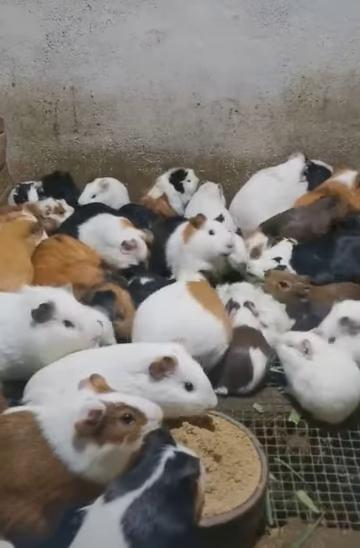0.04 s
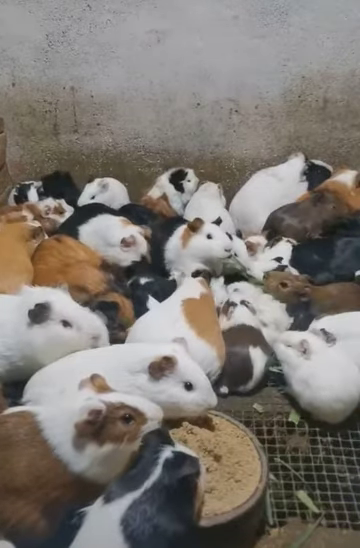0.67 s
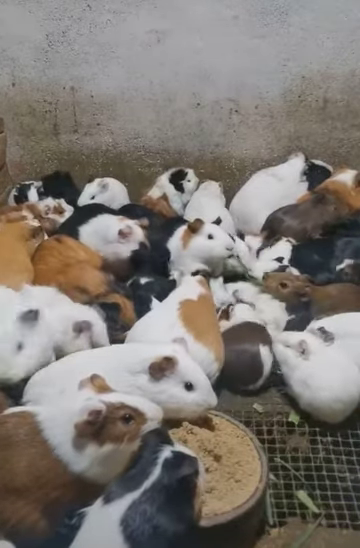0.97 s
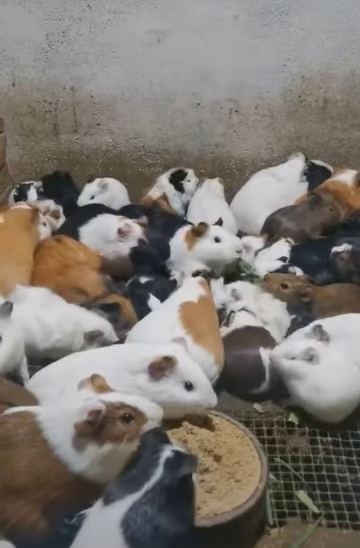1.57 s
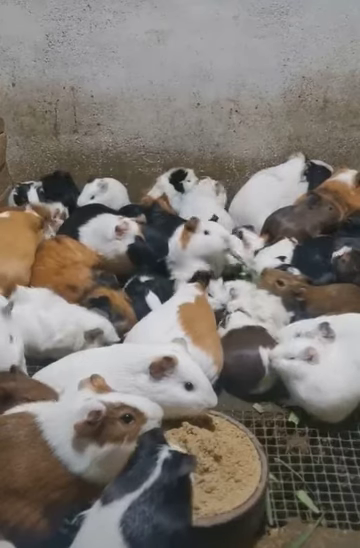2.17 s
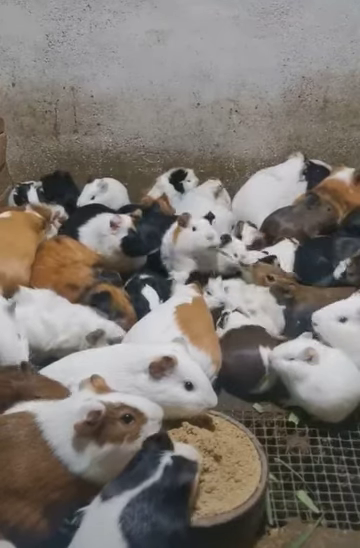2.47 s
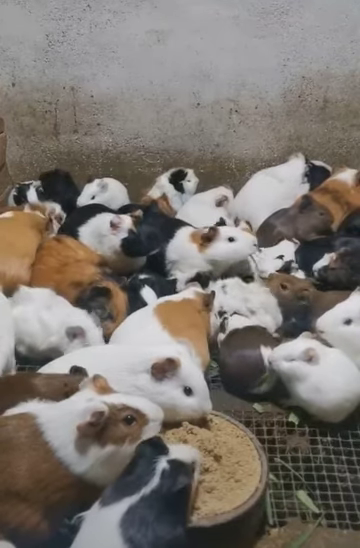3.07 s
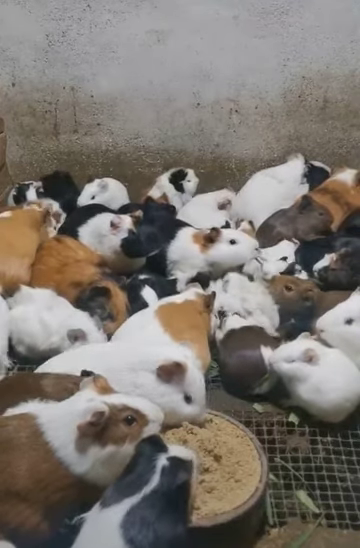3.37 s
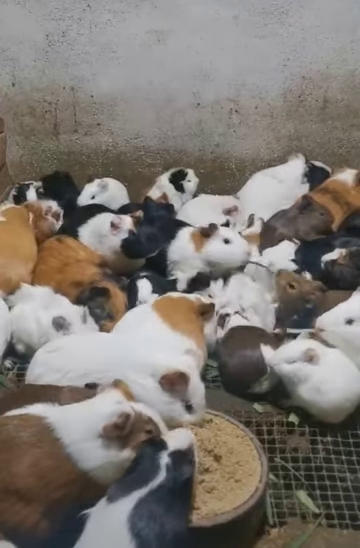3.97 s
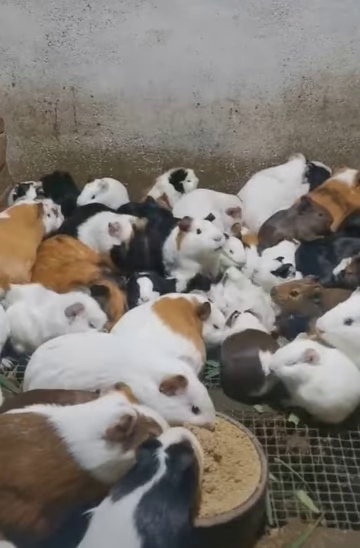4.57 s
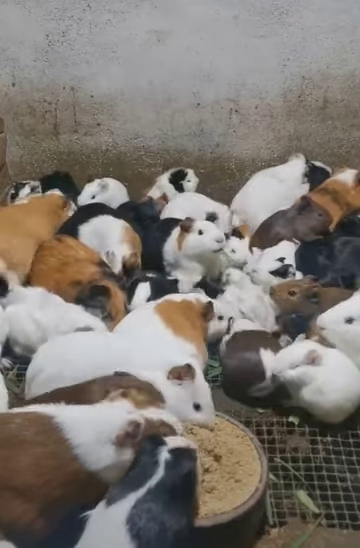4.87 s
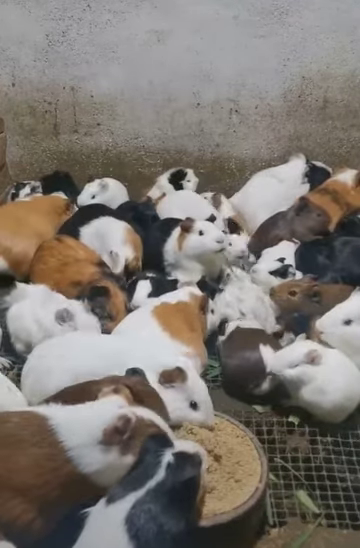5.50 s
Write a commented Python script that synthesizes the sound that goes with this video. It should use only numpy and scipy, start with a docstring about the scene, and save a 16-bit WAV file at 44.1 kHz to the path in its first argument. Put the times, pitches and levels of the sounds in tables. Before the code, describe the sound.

A herd of guinea pigs calls nearby throughout, in short notes that dip and flick upward, several a second, with a brief echo from concrete walls. Underneath are a steady fine crackle of nibbling, a soft air rumble and a faint electric hum. Feet scrape brightly over wire mesh, mostly in the first 1.4 seconds. Rough squeals and hoarse, more distant squabbling come from 0.6 to 1.5 seconds. Grass stalks crackle around 1.3 seconds, and a claw plucks the wire with a sharp click at 1.85; smaller ringing clicks are scattered elsewhere. Between 2.5 and 3.1 seconds come yips, louder bending squeals and two very faint, thin, high whistles. Near 4 seconds a wire rattle and a grass crackle lead into three quick yips. From 4.6 to 5.4 seconds a dense run of squeals overlaps more squabbling, and a few last calls follow at about 5.7.

```python
"""A crowd of guinea pigs calls and feeds on a wire mesh floor in a concrete pen.
They chut (short notes that dip, then flick upward), and squeal, yip and squabble as they jostle;
strain makes their voices rough. Feet scrape and claws pluck the wire, so it rings, and grass
stalks crackle as they tear. Under it the herd nibbles steadily, the air rumbles and the mains
hum faintly. Two thin, very high whistles pass midway, and the walls add a short echo."""
import sys
import numpy as np
from scipy import signal
from scipy.fft import rfft, irfft
from scipy.io import wavfile
from scipy.ndimage import uniform_filter1d, minimum_filter1d

SR = 44100
rng = np.random.default_rng(int(sys.argv[2]) if len(sys.argv) > 2 else 0)


def dump_mix(stems):
    """Bounce the given channels to the path in sys.argv[1] as a 16-bit WAV at rate SR."""
    frames = np.atleast_2d(stems).T  # one column per channel
    limited = np.clip(frames, -1, 1)  # hard clip at full scale
    pcm = np.round(limited * 32767).astype(np.int16)
    wavfile.write(sys.argv[1], SR, pcm)


N = 253134
TIME = np.arange(N) / SR


def from_db(db):
    """Turn decibels into a number to multiply by."""
    return 10 ** (np.asarray(db) / 20)


def rms_one(x):
    """Scale a signal so that its average power is 1."""
    return x / np.sqrt(np.mean(x ** 2) + 1e-20)


def at_hz(points, hz):
    """Read the level at a frequency from a curve of (frequency_hz, level_db) points."""
    point_hz, point_db = np.transpose(points)
    return np.interp(np.log(np.maximum(hz, 1)), np.log(point_hz), point_db)


def colour(x, spectrum):
    """Shape the tone of a signal with a curve of levels; the result has power 1."""
    hz = np.arange(N // 2 + 1) * SR / N
    return rms_one(irfft(rfft(x) * from_db(at_hz(spectrum, hz)), N))


def band(x, low_hz, high_hz):
    """Gently turn down everything outside two frequencies."""
    sos = signal.butter(2, [low_hz, min(high_hz, .45 * SR)], "band", fs=SR, output="sos")
    return signal.sosfilt(sos, x + 1e-18)


def above(x, edge_hz):
    """Steeply cut everything below a frequency."""
    return signal.sosfilt(signal.butter(4, edge_hz, "high", fs=SR, output="sos"), x + 1e-18)


def wobble(per_s, t):
    """A random wavering, about 1 in size, that takes a new turn per_s times a second."""
    knots = rng.standard_normal(int(len(t) * per_s / SR) + 2)
    return np.interp(np.arange(len(t)) * per_s / SR, np.arange(len(knots)), knots)


def span(start, end):
    """The time of each sample from start to end, in seconds."""
    return np.arange(round(start * SR), max(round(end * SR), round(start * SR) + 2)) / SR


def add(out, t, sound):
    """Mix a sound into out at the times t."""
    at = np.round(t * SR).astype(int)
    inside = (at >= 0) & (at < N)
    out[..., at[inside]] += sound[..., inside]


def phase_of(hz):
    """The growing angle of a wave that follows a changing pitch."""
    return 2 * np.pi * np.cumsum(hz) / SR


def cry(t, hz, rough, jitter=0.067, shimmer=0.95, overtone_db=-15, strain_db=11.5, rasp_db=-8):
    """A squealing voice: strain shakes its pitch and level, lifts the overtones and adds a rasp."""
    # how the throat boosts or weakens overtones: frequency_hz, level_db
    throat = [(200, -8), (900, 16), (1500, -0.5), (1750, 3), (1950, 0.5), (2150, -3.5), (2400, -15.5),
              (3000, -10), (5000, -16.5)]
    phase = phase_of(hz * (1 + jitter * rough * wobble(491, t)))
    tone = np.sin(phase)
    for k in (2, 3):
        level_db = (overtone_db + strain_db * rough) * np.log2(k) - 5.5 + at_hz(throat, k * hz)
        tone += from_db(level_db) * np.sin(k * phase)
    breath = rng.standard_normal(len(t)) * (1 + .5 * np.sin(phase))
    rasp = rms_one(signal.sosfilt(signal.butter(4, [750, 2050], "band", fs=SR, output="sos"), breath))
    shaky_tone = np.sqrt(2) * tone * (1 + shimmer * rough * wobble(329.7, t))
    return (shaky_tone + from_db(rasp_db) * rough * rasp) * from_db(1.5 * wobble(107.6, t))


def temper(flare_db=9, edge_s=.022, murmur_db=-65):
    """Loudness of the squabbling: each bout builds steadily, then breaks off to a faint murmur."""
    # bouts of squabbling: start_s, length_s, peak_db
    bouts = [(-.06, 0.082, -25), (0.584, .26, -22), (1.001, 0.14, -21.5), (1.809, .032, -18.5),
             (2.054, 0.27, -36.5), (2.8, 0.074, -25), (4.636, 0.155, -25), (5.017, 0.23, -24),
             (5.254, 0.16, -28), (5.417, 0.052, -33)]
    gain = np.full(N, from_db(murmur_db))
    for start, length, db in bouts:
        progress = np.clip((TIME - start) / length, 0, 1)
        edges = np.clip(np.minimum(TIME - start, start + length + edge_s - TIME) / edge_s, 0, 1)
        gain = np.maximum(gain, edges * from_db(db - flare_db * (1 - progress)))
    return gain


def squabble(count=170, gain_db=-2.5):
    """Many short hoarse cries overlap at the back of the pen, each sliding its own way."""
    # tone of the far-off voices: frequency_hz, level_db
    far_tone = [(350, -23), (650, -6), (1000, -8.5), (1450, 7.5), (1750, 4), (2100, 6),
                (2450, -7), (4000, -24)]
    out = np.zeros(N)
    for k, (late, length, pitch, slide) in enumerate(rng.random((count, 4))):
        start = (k + late) / count * N / SR
        t = span(start, start + 0.038 + 0.04 * length)
        hz = 560 * 2 ** (.9 * pitch + (slide - .4) * np.linspace(0, .4, len(t)))
        add(out, t, cry(t, hz, rough=0.52) * np.hanning(len(t)))
    return colour(out, far_tone) * temper() * from_db(gain_db)


def grains(per_s, spread_db):
    """Tiny taps at random moments, a few much harder than the rest."""
    sizes = from_db(spread_db * np.minimum(rng.exponential(1, N), 4)) * rng.choice([-1, 1], N)
    return rms_one(sizes * (rng.random(N) < per_s / SR))


def contact(age, attack_s, hold_s, fade_s):
    """Strength of a touch: it takes hold smoothly, lasts, then falls 60 dB in fade_s."""
    rise = np.sin(np.pi / 2 * np.clip(age / attack_s, 0, 1)) ** 2
    return rise * from_db(-60 * np.maximum(age - hold_s, 0) / fade_s)


def tread(force, tilt_db):
    """The spot trodden on splits a force between the wire's low and high ring; plus tilt favours high."""
    return force * from_db([[-tilt_db / 2], [tilt_db / 2]])


def mesh(taps, drive, split_hz=6900):
    """The wire floor rings under tiny taps; drive sets the strength of its low and its high ring."""
    # ring of the wire floor: frequency_hz, level_db
    wire_ring = [(1760, -30), (3000, -21.5), (3970, -28), (5250, -10.5), (7100, 3.5), (7460, 0), (7940, -9),
                 (8580, -11), (8820, -15), (9200, -21), (9870, -46), (10100, -85), (11200, -29),
                 (16000, -68)]
    ringing = colour(taps, wire_ring)
    lower = signal.sosfiltfilt(signal.butter(4, split_hz, fs=SR, output="sos"), ringing)
    return drive[0] * lower + drive[1] * (ringing - lower)


def scrapes(attack_s=0.027, fade_s=.28, fidget_db=-38.5, stutter_db=1.0):
    """Feet drag over the wire in runs of tiny slips: each scrape grips, stutters and rings out."""
    # foot drags: start_s, length_s, level_db, tilt_db
    drags = [(-.03, 0.033, -20.5, -6), (.06, 0.063, -22.5, -7), (0.103, 0.13, -12.5, -9.5),
             (0.246, 0.11, -13.5, -6.5), (0.691, 0.086, -20, -1), (.77, .11, -17.5, 2),
             (.89, 0.22, -20, -2), (1.012, 0.049, -16.5, -7), (1.105, 0.093, -27, 0),
             (1.244, 0.051, -13.5, 3), (1.32, 0.047, -21.5, 0), (1.59, .2, -28.5, 1),
             (1.785, 0.013, -16, -1), (2.34, 0.024, -17, 2), (2.65, 0.028, -24.5, 2),
             (2.806, 0.074, -27, 1), (2.963, .105, -20.5, -4), (3.102, .15, -30.5, -9),
             (3.352, 0.043, -25, 12), (4.668, 0.071, -30, -3), (5.347, .16, -27.5, -3)]
    power = np.full((2, N), from_db(fidget_db) ** 2)  # the herd never stands quite still
    for start, length, db, tilt_db in drags:
        t = span(start, start + length + fade_s)
        force = from_db(db) * contact(t - start, attack_s, length, fade_s)
        add(power, t, tread(force, tilt_db) ** 2)
    slips = grains(per_s=5000, spread_db=1.5)
    return mesh(slips, np.sqrt(power)) * from_db(stutter_db * wobble(70, TIME))


def chuts(jitter=0.044, dip=0.1415, third_db=-33, flutter_db=4, rasp_db=-17, throat_edge_hz=1270):
    """Each chut sags a little, then flicks up toward the pitch the throat rings at, which boosts it."""
    # chut notes (the octave is the overtone at twice the pitch):
    # start_s, length_s, low_pitch_hz, tone_db, octave_db
    notes = [(-.011, 0.04, 652, -16.5, -18), (.062, .067, 490, -21.5, -16), (0.337, 0.064, 531, -20, -21),
             (0.438, 0.053, 505, -25, -17), (0.466, 0.055, 580, -24, -34.5), (0.56, 0.052, 562, -20, -48),
             (0.692, .078, 510, -25, -16), (0.791, 0.085, 487, -26, -16.5), (0.918, 0.053, 510, -29, -29.5),
             (0.977, 0.0396, 516, -40, -25), (1.076, 0.067, 618, -29.5, -39),
             (1.199, 0.047, 543, -23.5, -18.5), (1.283, .061, 505, -24, -17.5),
             (1.371, 0.086, 542, -26.5, -30.5), (1.535, 0.041, 611, -28, -48),
             (1.638, 0.043, 556, -23, -20), (1.713, 0.051, 541, -19.5, -14.5),
             (1.789, 0.057, 567.4, -23, -18), (2.012, 0.033, 552, -20, -20),
             (2.072, 0.061, 533, -18, -16.5), (2.334, 0.052, 530, -22, -21),
             (2.422, 0.063, 511, -24.5, -19), (2.737, 0.043, 550, -19.5, -24),
             (2.82, 0.071, 523, -23.5, -28.5), (2.931, 0.081, 547, -26.5, -28.5),
             (3.205, .042, 549, -20, -22.5), (3.286, 0.025, 718, -21, -50),
             (3.294, 0.049, 520.4, -20.5, -21), (3.384, 0.057, 533, -22, -33),
             (3.701, 0.038, 547, -20.5, -27), (3.773, .058, 499, -22, -26),
             (3.861, 0.055, 517, -25.5, -28.5), (4.185, .04, 555.6, -15, -24.5),
             (4.261, 0.057, 514.4, -21, -23.5), (4.364, 0.043, 540, -25, -42.5),
             (4.669, 0.048, 541.6, -19.5, -19.5), (4.756, .046, 499.6, -21.5, -20),
             (4.853, 0.041, 507, -26.5, -19.5), (4.965, 0.048, 622, -25.5, -31),
             (5.154, 0.051, 568.5, -20, -26), (5.233, 0.07, 515, -22.5, -20.5),
             (5.332, 0.044, 540, -19.5, -26.5), (5.429, 0.06, 525, -28.5, -35),
             (5.656, 0.042, 552, -18, -35), (5.704, .06, 610, -26.5, -26)]
    # a pressed chut has a stronger octave and flicks higher: octave_db, rise_octaves
    flick = [(-47.5, 0.19), (-30, 0.62), (-14.5, 1.056)]
    out = np.zeros(N)
    manner = rng.uniform([.3, .5], [1, 1.5], (len(notes), 2))  # each call's roughness and depth of sag
    for (start, length, low_hz, tone_db, octave_db), (rough, sag) in zip(notes, manner):
        end_hz = low_hz * 2 ** np.interp(octave_db, *np.transpose(flick))
        t = span(start, start + length)
        progress = np.linspace(0, 1, len(t))
        hz = low_hz * (1 + sag * dip * (1 - progress) ** 4) + (end_hz - low_hz) * progress ** 4
        hz *= 1 + jitter * rough * wobble(396, t)
        phase = phase_of(hz)
        tone = from_db(tone_db + 12 * np.log2(hz / low_hz)) * np.sin(phase)  # 12 dB more per octave
        overtones = from_db(octave_db) * np.sin(2 * phase) + from_db(tone_db + third_db) * np.sin(3 * phase)
        # the overtones die once the octave climbs past the throat's ring
        overtones /= np.sqrt(1 + (2 * hz / throat_edge_hz) ** 28)
        breath = band(band(rng.standard_normal(len(t)), 570, 1300), 570, 1300)
        rasp = rms_one(breath) * rough * from_db(tone_db + rasp_db)
        swell = np.abs(np.sin(np.pi * progress)) ** 1.06
        flutter = from_db(flutter_db * rough * wobble(248, t))
        add(out, t, np.sqrt(2) * (tone + overtones + rasp) * swell * flutter)
    return out


def nibbling(level_db=-28.22, flicker_db=1.03):
    """Many mouths nibble at once, and their tiny bites blur into a steady crackle."""
    # tone of the bites: frequency_hz, level_db
    bite_tone = [(1880, -12.5), (3200, -12), (3660, -29), (5090, -6.5), (5560, -7.5), (7230, 5),
                 (7480, -1.5), (8050, -3), (9990, -13), (11300, -20.5), (13800, -27), (15200, -30),
                 (16000, -28)]
    bites = colour(grains(per_s=7000, spread_db=2.0), bite_tone)
    return bites * from_db(level_db + flicker_db * wobble(40, TIME))


def air(flicker_db=2.07):
    """The air of the pen rumbles and hisses softly."""
    # tone of the air: frequency_hz, level_db
    air_tone = [(15, -49), (25, -25), (92, 2.5), (210, -5.5), (267, -9.5), (480, -7), (547, -5),
                (623, -7.5), (921, -14.5), (1330, -17), (1590, -26.5), (1690, -36), (2340, -12.5),
                (3950, -15.5), (4500, -14), (5850, -14.5), (9900, -120)]
    # its slow drift in loudness: time_s, level_db
    drift = [(0, -35), (2.0, -35.5), (4.0, -36.5), (4.7, -35.5), (5.74, -34.5)]
    level_db = np.interp(TIME, *np.transpose(drift)) + flicker_db * wobble(25, TIME)
    return band(colour(rng.standard_normal(N), air_tone) * from_db(level_db), 39, 9300)


def mains_hum(sway_db=2.5):
    """The electric supply hums on two low tones whose level sways."""
    # hum tones: pitch_hz, level_db
    tones = [(100, -43.5), (200, -49.5)]
    hum = sum(np.sqrt(2) * from_db(db) * np.sin(2 * np.pi * hz * TIME) for hz, db in tones)
    return hum * from_db(sway_db * wobble(8, TIME))


def squeals(swell_shape=0.37, gain_db=0.5):
    """Jostled animals complain: each note swells and fades while its pitch bends between two ends."""
    # squeal notes (a minus sag arches upward):
    # start_s, length_s, first_pitch_hz, last_pitch_hz, sag_octaves, level_db, roughness
    notes = [(.005, 0.06, 811, 732, 0.011, -21.5, 0.47), (0.653, 0.027, 970, 946, 0.02, -24, 0.4),
             (.668, 0.072, 634.5, 787, -0.015, -22.5, 0.4), (.74, 0.062, 770, 1011, 0.072, -21.5, 0.54),
             (0.854, 0.065, 718, 757, -.3, -29, 0.3), (1.013, 0.038, 1520, 1444, 0, -25, 0.8),
             (1.075, 0.056, 1495, 1432, 0.014, -28, 0.9), (1.108, .035, 1410, 1007, 0, -27, 0.88),
             (1.327, 0.058, 975, 1007, 0.043, -21.5, 0.37), (1.391, 0.048, 1106, 1143, -0.004, -15, 0.24),
             (1.457, 0.038, 1086, 1085, 0.077, -20.5, .28), (2.826, 0.051, 993, 1162, -0.077, -13, 0.23),
             (2.866, 0.1, 1170, 1290, .36, -18, 0.23), (2.978, 0.087, 1169, 1386, 0.26, -19, 0.19),
             (3.121, 0.046, 1128, 1374, 0.018, -23, 0.16), (3.588, 0.025, 776, 808, 0.052, -28.5, 0.42),
             (4.571, 0.046, 1106, 1028, 0.028, -29, 0.5), (4.593, 0.057, 757, 810, 0.083, -25, 0.52),
             (4.615, 0.073, 1497, 1492, 0.004, -29, 0.32), (4.676, 0.041, 1094, 1142, 0.013, -23, 0.63),
             (4.705, 0.082, 815, 965, 0.071, -26.5, .43), (4.784, 0.041, 1016, 1030, 0.021, -20, 0.06),
             (4.827, 0.042, 1034, 1303, .03, -17, 0.12), (4.875, 0.033, 1614, 1497, 0.05, -25, 0.42),
             (4.892, 0.043, 1350, 1288, 0.044, -18.5, 0.14), (4.93, .042, 1303, 1377, 0.013, -13, .18),
             (4.989, .095, 1004, 875, -0.055, -24.5, 0.37), (5.039, 0.15, 1310, 1324, -0.014, -29, 0.77),
             (5.1, .05, 885, 813, -0.0068, -25, 0.27), (5.196, .03, 955, 983, 0.03, -25, 0.5),
             (5.24, 0.16, 802, 870, 0.011, -30, 0.82), (5.663, 0.03, 1945, 1967, 0.0067, -22.5, 0.25),
             (5.699, 0.066, 1030, 1000, 0.037, -27, 1.06)]
    out = np.zeros(N)
    for start, length, first_hz, last_hz, sag, db, rough in notes:
        t = span(start, start + length)
        progress = np.linspace(0, 1, len(t))
        arc = np.abs(np.sin(np.pi * progress))
        hz = first_hz * (last_hz / first_hz) ** progress * 2 ** (-sag * arc)
        add(out, t, cry(t, hz, rough) * arc ** swell_shape * from_db(db + gain_db))
    return out


def claw_snaps(attack_s=.0017, click_fade_s=0.019, crack_db=-24):
    """A claw plucks the wire: a sharp click, then the mesh rattles out."""
    # plucks: start_s, click_db, rattle_db, rattle_fade_s, brightness_db, tilt_db
    plucks = [(.063, -19, -19, .08, -8, -2), (.118, -20, -25, .06, -14, -2),
              (0.532, -16, -20, 0.26, -12, -15), (1.264, -14, -6.5, 0.21, -9, 15),
              (1.411, -15, -16.5, 0.37, -10, 8), (1.598, -24, -18, .06, -1, 3),
              (1.8507, -1, -11.5, 0.15, -3, -1), (2.639, -9.5, -30, .06, -12, 8),
              (2.755, -12, -7, 0.1, -18, -10), (3.049, -17, -13.5, 0.067, -14, 9),
              (3.066, -25, -17, .05, -15, 6), (3.571, -24, -19.5, 0.09, 0, 10),
              (3.945, -21, -6.5, 0.14, -2, 21), (4.149, -18, -30, .043, 0, 10),
              (4.526, -25, -16, .21, -18, -7)]
    # tone of the crack as a claw meets the wire: frequency_hz, level_db
    crack_tone = [(1500, -22), (2800, -2), (8500, 3.5), (10500, 1), (13000, -11), (16000, -26)]
    drive, crack_gain = np.zeros((2, N)), np.zeros(N)
    for start, click_db, rattle_db, fade_s, brightness_db, tilt_db in plucks:
        t = span(start, start + fade_s + click_fade_s)
        rattle = from_db(rattle_db) * contact(t - start, attack_s, 0, fade_s)
        click = from_db(click_db) * contact(t - start, attack_s, 0, click_fade_s)
        add(drive, t, tread(np.hypot(click, rattle), tilt_db))
        add(crack_gain, t, rattle * from_db(brightness_db + crack_db))
    ringing = mesh(grains(per_s=14000, spread_db=2.5), drive)
    return ringing + crack_gain * colour(rng.standard_normal(N), crack_tone)


def stalks(splinter_ratio=1.25, splinter_db=-19):
    """Grass fibres give way in brief bright crackles; finer splinters sound faintly above them."""
    # stalks tearing and brushing: start_s, length_s, centre_hz, relative_width, level_db
    tears = [(0.189, .06, 3260, .3, -35), (.27, .04, 12500, .22, -41), (0.496, 0.037, 2490, 0.19, -29.5),
             (1.032, 0.057, 8400, .12, -18.5), (1.223, 0.083, 13200, .28, -40),
             (1.266, 0.069, 8250, .1, -13), (1.57, 0.034, 10700, .22, -33),
             (2.035, 0.041, 2630, .18, -29.5), (2.116, .14, 13200, .27, -47),
             (3.244, 0.042, 12500, .25, -43), (3.36, .038, 9750, .17, -29), (3.92, .03, 12900, .3, -30),
             (3.938, 0.046, 8700, 0.5, -17.5)]
    out = np.zeros(N)
    for start, length, hz, width, db in tears:
        t = span(start, start + length)
        fibres = rng.standard_normal(len(t)) * (rng.random(len(t)) < .25)
        for centre, level_db in (hz, db), (hz * splinter_ratio, db + splinter_db):
            crackle = rms_one(band(fibres, centre * np.exp(-width / 2), centre * np.exp(width / 2)))
            add(out, t, crackle * np.sqrt(np.hanning(len(t))) * from_db(level_db))
    return out


def yips(attack_s=0.0044, throat_hz=1980, throat_db=-14, burst_db=4, fade_db=9):
    """A yip bursts out and usually drops in pitch as it dies; the open throat rings hoarsely above."""
    # yips of protest: start_s, length_s, first_pitch_hz, last_pitch_hz, level_db, roughness
    notes = [(0.614, 0.041, 1164, 943, -22.5, 0.5), (2.506, .055, 1057, 880, -16.5, 0.83),
             (2.79, 0.019, 1220, 772, -11.5, 0.5), (2.814, .035, 962, 914, -21, 1),
             (3.567, 0.046, 1272, 746, -26.5, 0.3), (3.666, 0.016, 940, 840, -27.5, 0.05),
             (3.984, 0.0233, 1175, 872, -14, 0.23), (4.067, 0.017, 1245, 916, -11, .15),
             (4.087, 0.043, 1084, 726, -21, 0.2), (5.663, 0.04, 986, 1007, -23, 0.4)]
    out = np.zeros(N)
    for start, length, first_hz, last_hz, db, rough in notes:
        t = span(start, start + length)
        progress = np.linspace(0, 1, len(t))
        hz = last_hz + (first_hz - last_hz) * (1 - progress) ** 2
        swell = np.clip((t - t[0]) / attack_s, 0, 1) * (1 - progress ** 2)
        breath = rms_one(band(rng.standard_normal(len(t)), throat_hz * 0.95, throat_hz * 1.032))
        voice = cry(t, hz, rough) + breath * from_db(throat_db) * 2 * rough
        add(out, t, voice * swell * from_db(db + burst_db - fade_db * progress))
    return out


def whistles(waver=.009):
    """Very high, faint tones that sink slightly."""
    # thin whistles: start_s, length_s, first_pitch_hz, last_pitch_hz, level_db
    notes = [(2.517, .11, 12650, 12550, -52), (2.74, .36, 11950, 11600, -53)]
    out = np.zeros(N)
    for start, length, first_hz, last_hz, db in notes:
        t = span(start, start + length)
        hz = np.linspace(first_hz, last_hz, len(t)) * (1 + waver * wobble(600, t))
        add(out, t, np.sqrt(2) * np.sin(phase_of(hz)) * np.sqrt(np.hanning(len(t))) * from_db(db))
    return out


def back_wall(x, delay_s=.034, echo_db=-17.5):
    """The bare wall behind the herd throws a call back once."""
    return x + from_db(echo_db) * np.interp(TIME - delay_s, TIME, x, left=0)


def pen(x, echo_db, first_echo_s=0.0058, fade_s=0.17):
    """Many close echoes bounce off the concrete walls and die quickly."""
    t = span(0, fade_s)
    echoes = rng.standard_normal(len(t)) * from_db(-60 * t / fade_s) * (t > first_echo_s)
    echoes /= np.sqrt(np.sum(echoes ** 2))
    return x + from_db(echo_db) * signal.fftconvolve(x, echoes)[:N]


def scene():
    """Voices and floor noises heard at one point in the pen, with no deep bass, alike in both ears."""
    near_voices = pen(back_wall(chuts() + squeals()) + yips() + whistles(), echo_db=-6)
    far_voices = pen(squabble(), echo_db=-7.5)
    floor = pen(above(scrapes(), edge_hz=4320) + claw_snaps() + stalks(), echo_db=-10)
    mix = near_voices + far_voices + floor + nibbling() + air() + mains_hum()
    return np.tile(above(mix, edge_hz=53), (2, 1))


def record(dry, ceiling=.93, cutoff_hz=15900):
    """A fast limiter turns down the loudest peaks, then the highest treble is cut."""
    safe_gain = np.minimum(1, ceiling / (np.abs(dry) + 1e-9))
    smooth_gain = uniform_filter1d(minimum_filter1d(safe_gain, size=61), size=61)
    treble_cut = signal.ellip(10, .1, 90, cutoff_hz, fs=SR, output="sos")
    return signal.sosfilt(treble_cut, dry * smooth_gain)


dry = scene()
out = record(dry)
dump_mix(out)
```